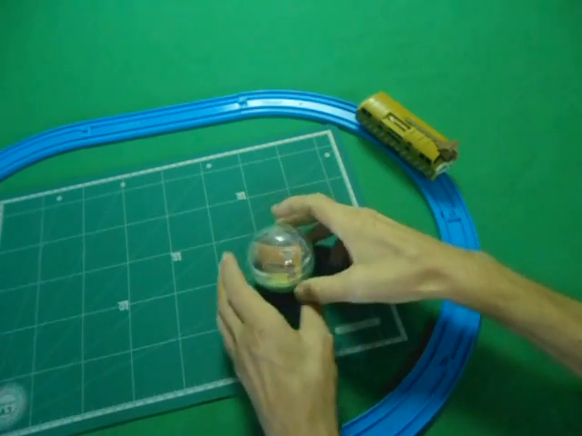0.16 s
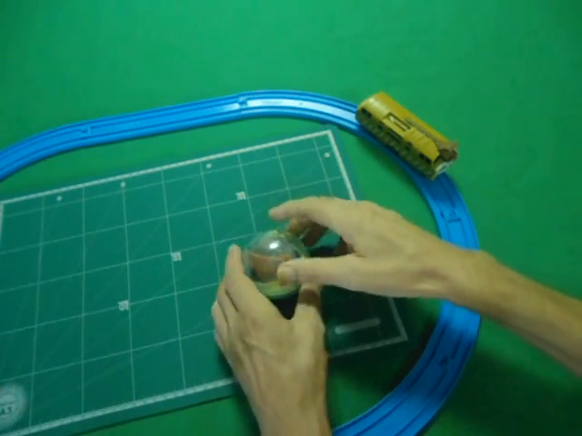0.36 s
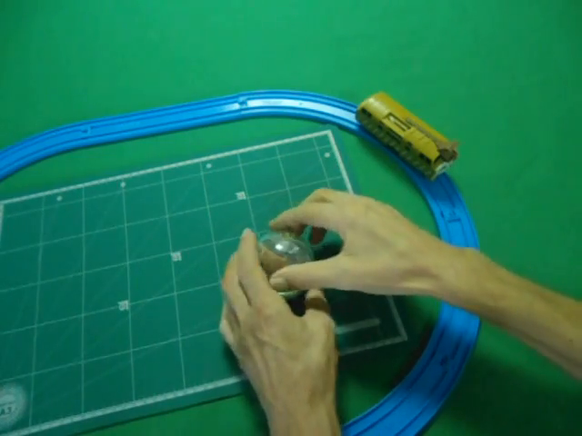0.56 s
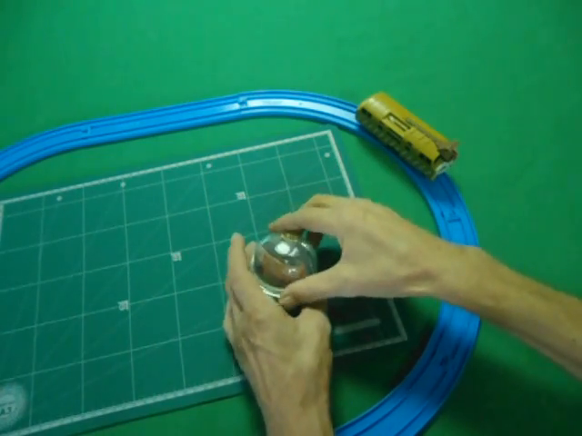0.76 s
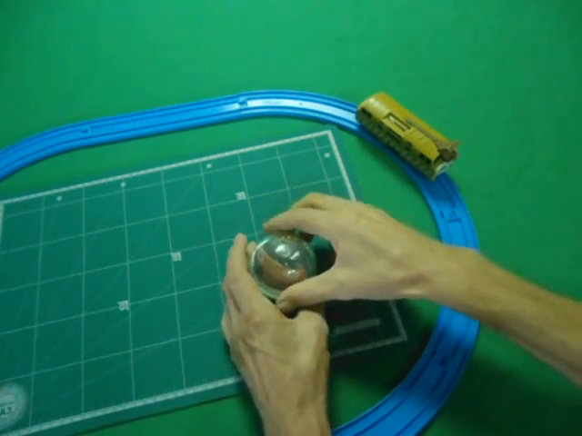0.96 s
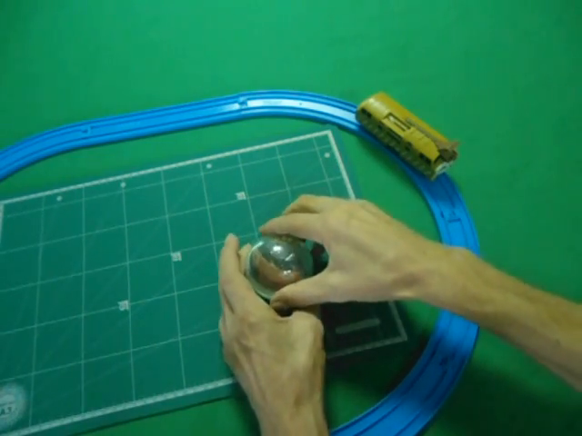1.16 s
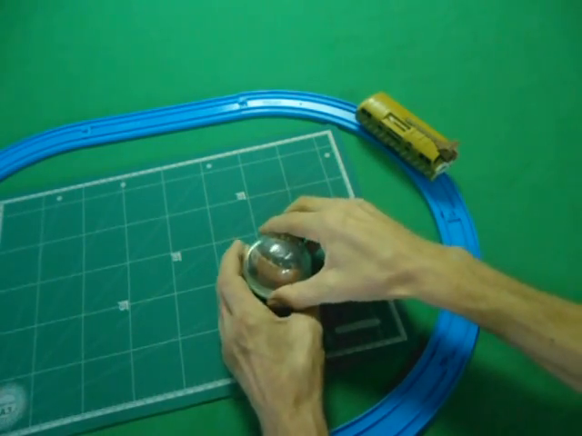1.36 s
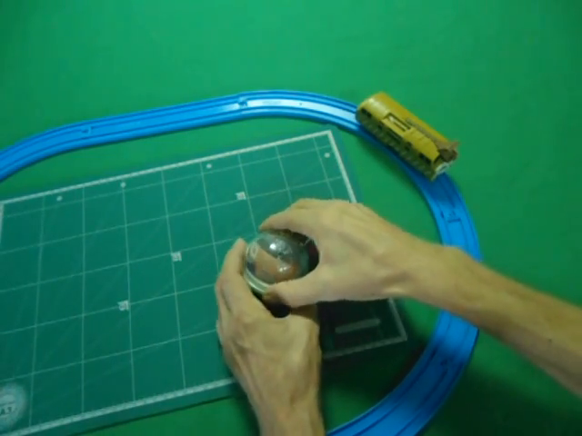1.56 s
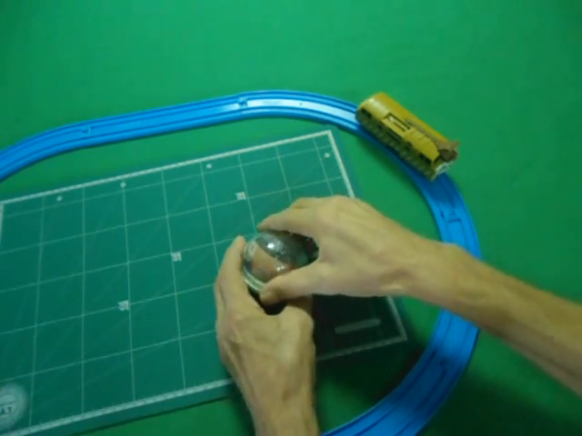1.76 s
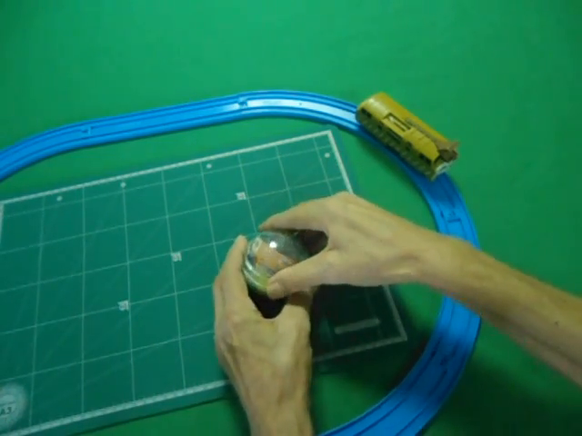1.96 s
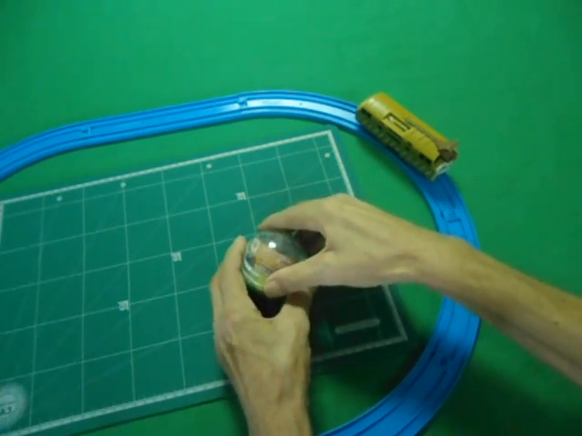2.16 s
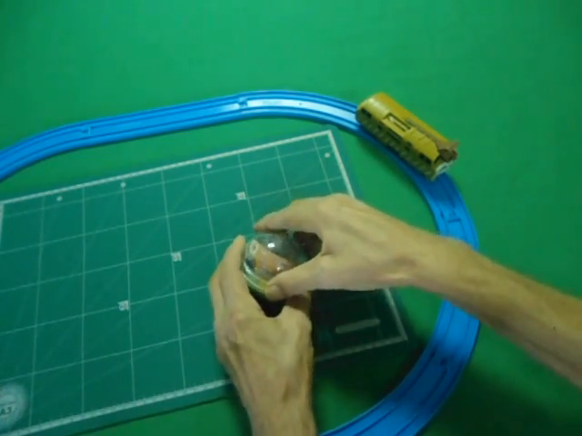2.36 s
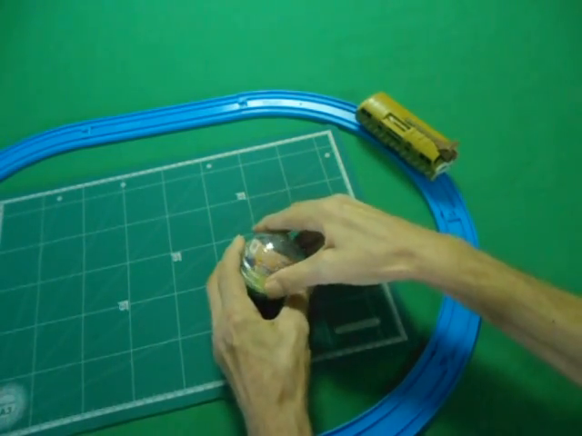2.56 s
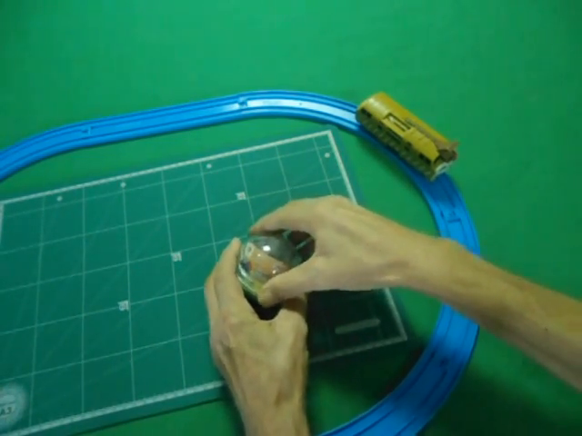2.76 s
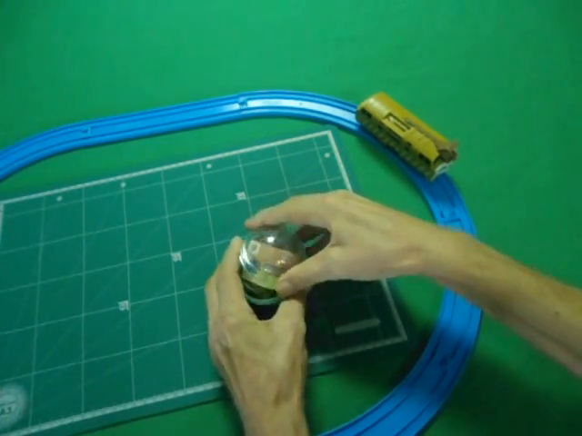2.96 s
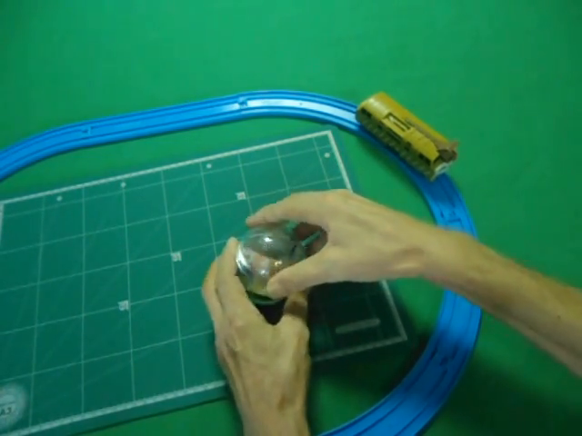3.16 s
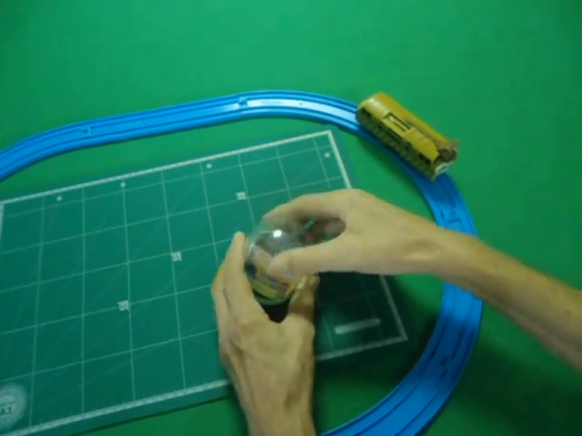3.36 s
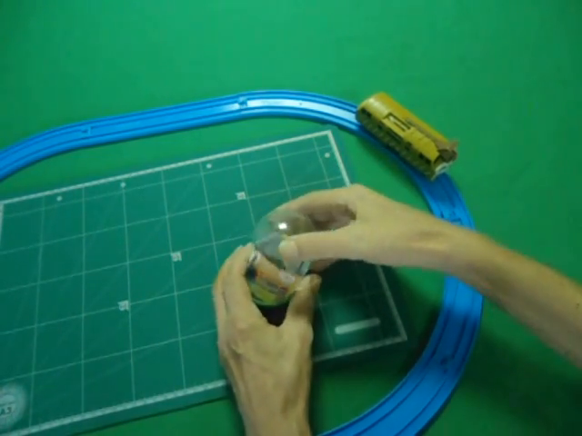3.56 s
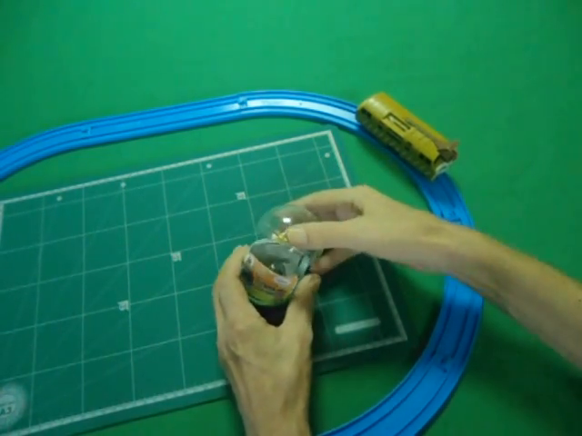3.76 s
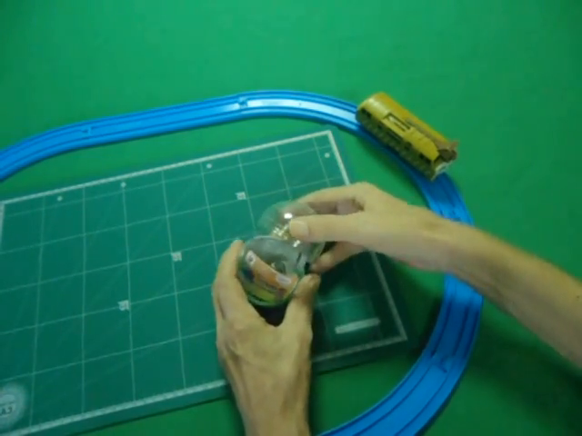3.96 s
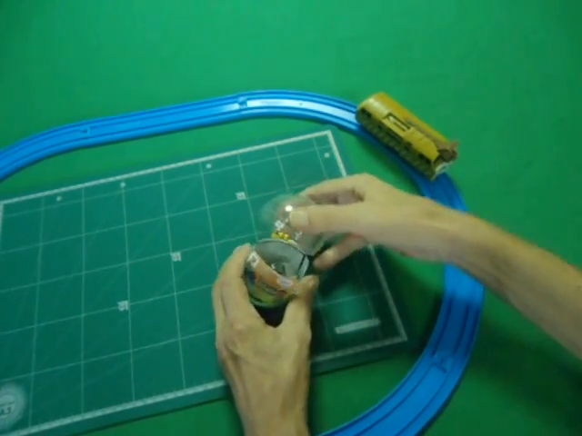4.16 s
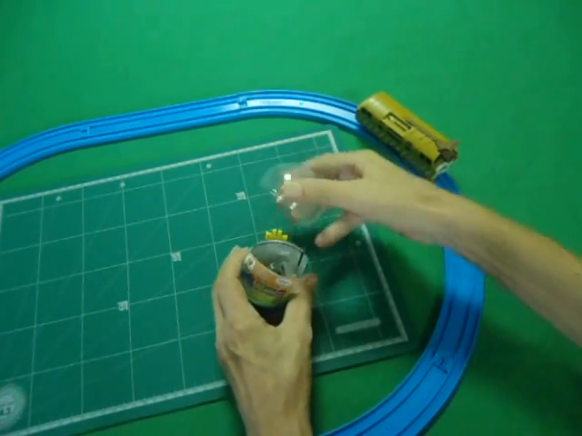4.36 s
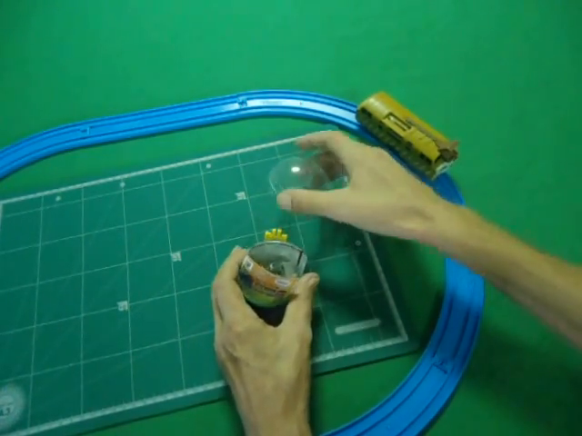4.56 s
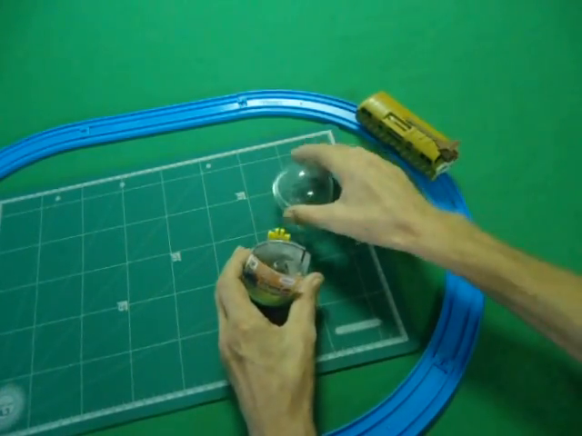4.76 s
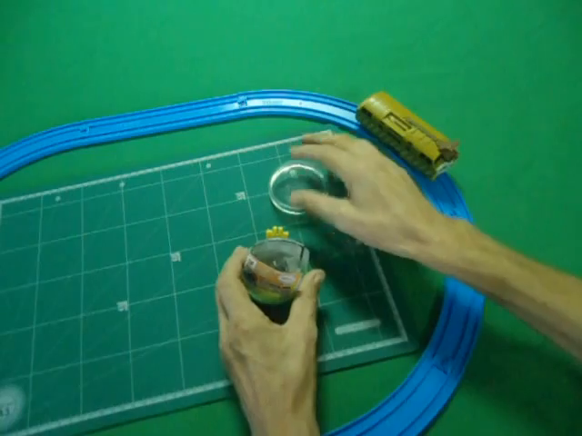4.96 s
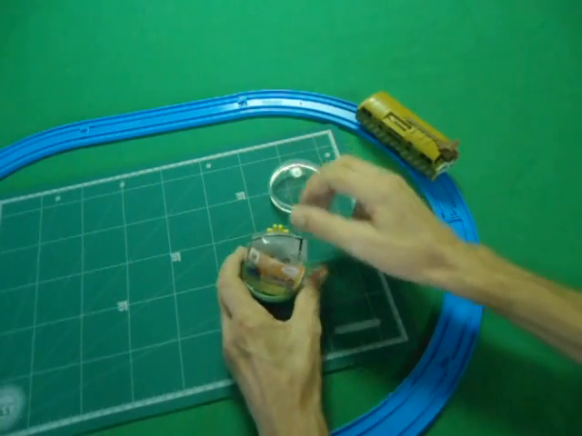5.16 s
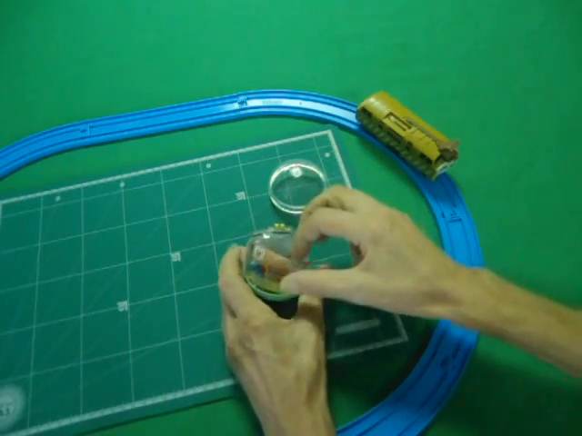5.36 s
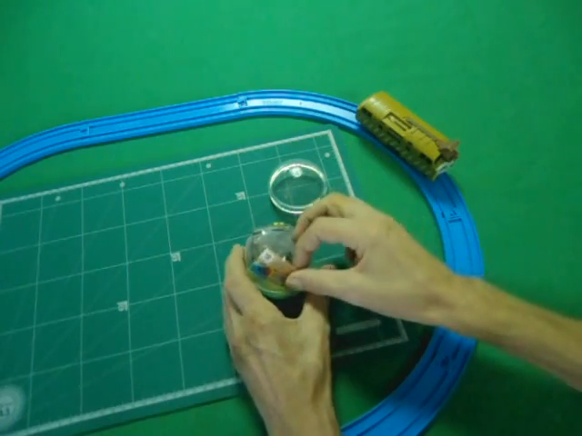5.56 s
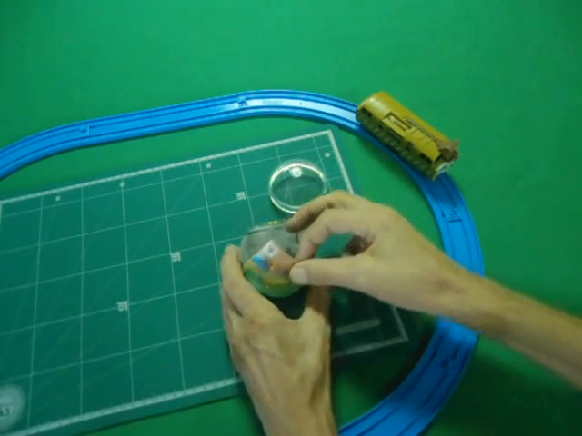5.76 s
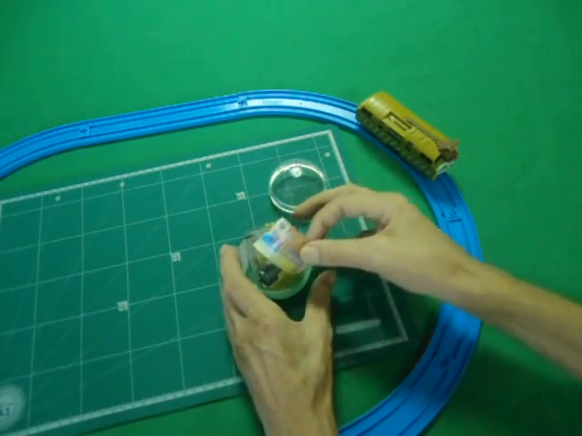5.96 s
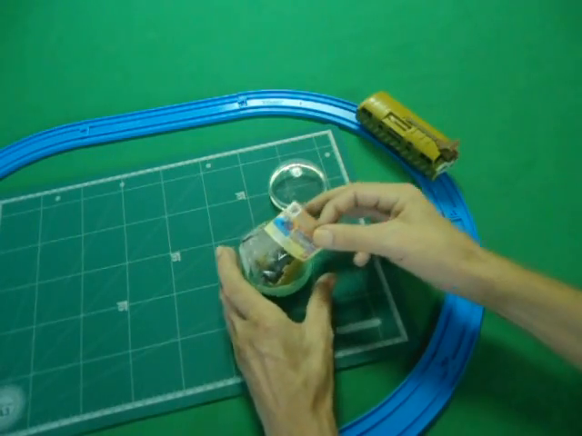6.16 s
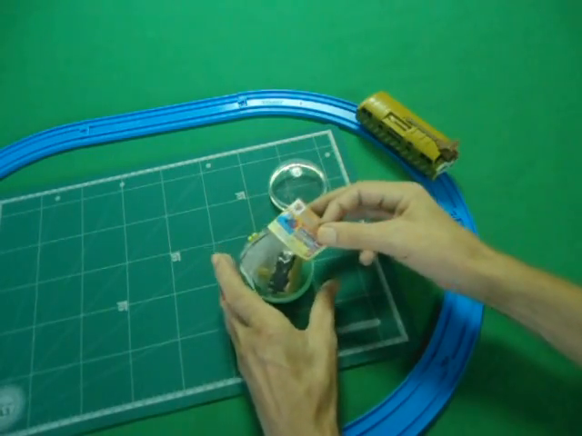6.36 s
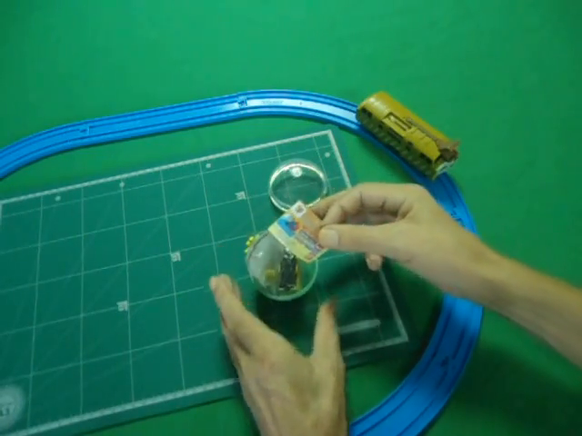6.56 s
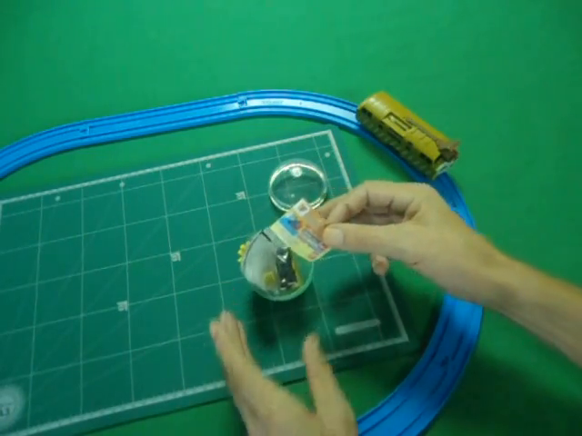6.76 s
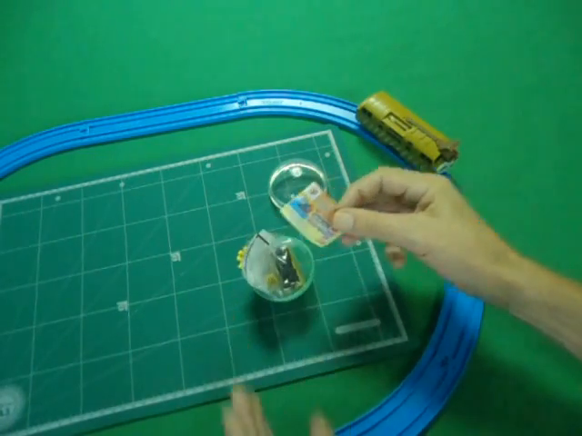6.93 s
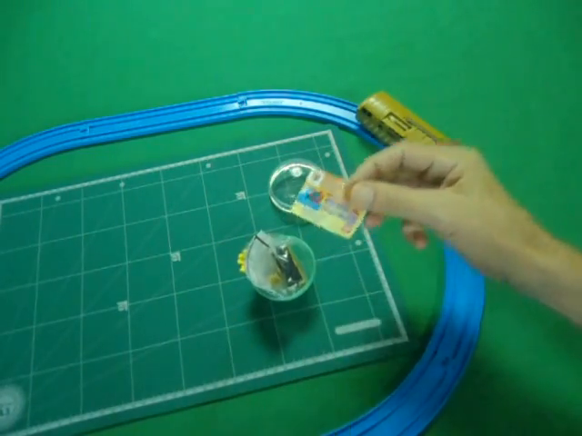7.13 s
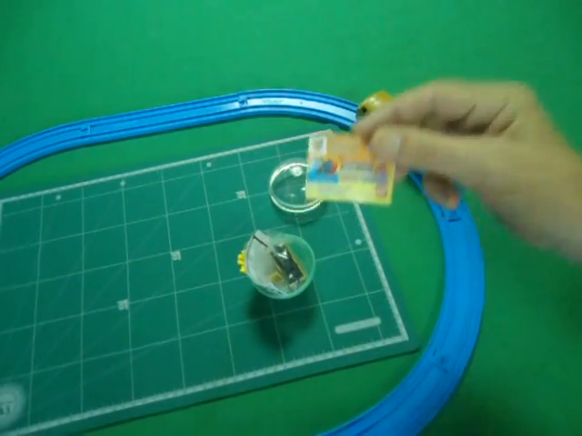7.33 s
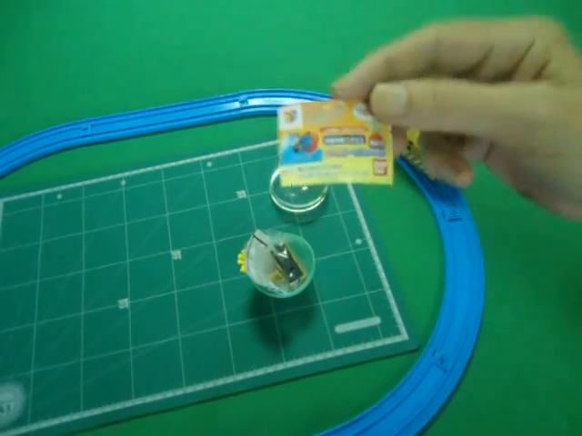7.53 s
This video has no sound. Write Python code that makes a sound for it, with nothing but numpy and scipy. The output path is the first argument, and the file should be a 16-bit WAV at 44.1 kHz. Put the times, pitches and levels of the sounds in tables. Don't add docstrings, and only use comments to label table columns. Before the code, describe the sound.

Close on a table in a small echoing room: low wavering machine hum, faint far bird and pulsing insect. A plastic capsule snaps apart in sharp dry cracks, with light rubbing and sticky ticks afterwards. The lid hits the table very hard and bounces rapidly, briefly ringing, then light fingering and quiet before low thumps and a hollow knock at the end. Limited treble, slightly gritty camera sound.

```python
import sys
import numpy as np
from scipy import signal
from scipy.io import wavfile
from scipy.ndimage import uniform_filter1d

SR = 44100
rng = np.random.default_rng(int(sys.argv[2]) if len(sys.argv) > 2 else 0)


def log_audio(samples):
    frames = np.atleast_2d(samples).T
    limited = np.clip(frames, -1, 1)
    pcm = np.round(limited * 32767).astype(np.int16)
    wavfile.write(sys.argv[1], SR, pcm)


def nominal_scale(level):
    x = np.asarray(level, float) / 20
    return 10 ** x


N = 334851


def evened(x):
    return x / np.sqrt(np.mean(x ** 2) + 1e-20)


def read(points, hz):
    f, value = np.transpose(points)
    return np.interp(np.log(hz + 1), np.log(f + 1), value)


def add(mix, start_s, sound):
    part = mix[round(start_s * SR):][:len(sound)]
    part += sound[:len(part)]


def resonate(x, hz, width_hz):
    turn = np.exp(2j * np.pi * np.cumsum(hz * np.ones(len(x))) / SR)
    r = np.exp(-np.pi * width_hz / SR)
    smoothed = signal.lfilter([1 - r], [1, -r], x / turn)
    return 2 * (turn * smoothed).real


def ring(t, db, hz, t60, rise=0.00029):
    dying = nominal_scale(db - 60 * t / max(t60, .003))
    return dying * np.sin(2 * np.pi * hz * t) * (1 - np.exp(-t / rise))


def wander(rate_hz, count):
    t, f = np.arange(0, N + 512, 512) / SR, np.geomspace(rate_hz / 12, rate_hz, 16)
    turns = f * t[:, None, None] + rng.random((count, len(f)))
    slow = (np.sin(2 * np.pi * turns) / f ** 0.1).sum(axis=2).T
    return [np.interp(np.arange(N) / SR, t, evened(v)) for v in slow]


# frequency in Hz, time to die by 60 dB in seconds.
ECHO = [(100, 0.43), (500, 0.24), (1000, 0.43), (2500, 0.39), (5000, 0.34)]


def room(x):
    taps = np.zeros(SR // 2)
    at = np.arange(150, len(taps) - 20, 20)
    taps[at + rng.integers(0, 20, len(at))] = rng.choice([-1., 1.], len(at))
    hz, t, z = signal.stft(taps, SR, nperseg=256)
    t60 = np.maximum(read(ECHO, hz), .05)[:, None]
    tail = signal.istft(z * nominal_scale(-60 * t / t60), SR, nperseg=256)[1]
    return signal.fftconvolve(x, tail / np.linalg.norm(tail))[:N]


# frequency in Hz, level
# in dB per Hz.
AIR_COLOUR = [(15, -7.5), (28, 4), (45, -6), (70, -13), (120, -10.5), (200, -12.5),
              (300, -17.5), (500, -22.5), (800, -26.5), (1200, -29), (1700, -33), (2500, -35), (4000, -38.5),
            (5500, -36)]
# time in seconds, level in dB.
DRAUGHT = [(0, 4), (1.8, 3), (3.6, 4), (4.8, 4.5), (5.4, 3.5), (6.6, 3.5), (7.1, 2.5), (7.4, 7)]
AIR_DB, HISS_SHARE = -37, 0.37


def air():
    frames, hz = N // 512 + 5, np.fft.rfftfreq(2048, 1 / SR)
    a, b, patches = rng.standard_normal((frames, 1025, 3)).T
    patches = uniform_filter1d(patches, size=14, axis=0)
    patches = evened(uniform_filter1d(patches, size=8, axis=1))
    t, low = np.arange(frames) * 512 / SR, 1 / (1 + (hz[:, None] / 200) ** 2)
    swell_db = (low + HISS_SHARE * (1 - low)) * np.interp(t, *np.transpose(DRAUGHT))
    colour_db = read(AIR_COLOUR, hz)[:, None]
    shape = nominal_scale(colour_db + 1.1 * patches) * (hz < 8000)[:, None]
    spectra = (a + 1j * b) * shape * nominal_scale(swell_db)
    noise = signal.istft(spectra, nperseg=2048, noverlap=1536)[1][:N]
    return nominal_scale(AIR_DB) * evened(noise)


# time in seconds, rms level of the shaft's first order in dB.
LOAD = [(0.05, -31), (0.55, -32), (0.78, -38), (1.04, -28.5), (1.52, -39), (1.65, -30.5), (2.23, -38),
        (2.37, -31), (2.89, -29.5), (2.96, -45), (3.1, -33), (3.18, -38), (4.25, -33), (4.57, -37),
        (5.97, -35.5), (6.21, -37), (6.43, -32.5), (7.3, -31)]
# multiple of the speed, level in dB, share of the load swing, own wander in dB.
SHAFT_ORDERS = [(1, -1.2, 1.0, 0.6), (2, -31, .3, 1.5), (3, -45, .3, 2.0), (5, -42, .2, 2.2)]
# time in seconds, frequency in Hz, rms level in dB.
FAR_MOTOR = [(0, 144, -47.5), (.5, 144, -59.5), (1.4, 144, -61.5), (1.9, 145, -41), (2.2, 145, -45.5),
             (2.4, 145, -42.5), (2.75, 145, -43), (2.95, 145, -47), (3.55, 144.5, -40.5), (3.95, 146, -52),
             (4.299, 155, -44), (4.85, 150, -50.5), (5.101, 145, -45.5), (5.5, 148, -50.5), (6.1, 151, -49),
             (6.6, 155, -45.5), (7.251, 152, -48), (7.59, 157, -42.5)]
SHAFT_HZ = 47.7


def machines():
    t = np.arange(N) / SR
    slip = wander(6.0, count=1)[0]
    load_db = np.interp(t, *np.transpose(LOAD))
    hum = np.zeros(N)
    for (k, db, share, own_db), w in zip(SHAFT_ORDERS, wander(5.0, count=4)):
        turns = round(k) * (SHAFT_HZ * t + 0.017 * slip) + rng.random()
        hum += nominal_scale(db + share * load_db + own_db * w) * np.sin(2 * np.pi * turns)
    s, hz, db = np.transpose(FAR_MOTOR)
    motor_turns = np.cumsum(np.interp(t, s, hz)) / SR
    motor = nominal_scale(np.interp(t, s, db, left=-90)) * np.sin(2 * np.pi * motor_turns)
    return np.sqrt(2) * (hum + motor)


# start in seconds, rms level in dB, Hz at start, Hz at end, length in seconds.
BIRD_PEEPS = [
    (0.214, -54.5, 4500, 4700, 0.028),
    (0.42, -60, 3280, 3300, 0.16),
    (0.674, -56, 2390, 2460, 0.13),
    (3.895, -56, 4550, 4930, 0.028),
    (3.92, -57, 4100, 4000, 0.08),
    (4.031, -62, 3300, 3200, 0.38),
    (3.69, -66, 3130, 3100, .06),
]


def bird():
    out = np.zeros(N)
    for s, db, start_hz, end_hz, length in BIRD_PEEPS:
        hz = np.linspace(start_hz, end_hz, int(length * SR))
        blur = resonate(rng.standard_normal(SR)[:len(hz)], hz, 160)
        add(out, s, nominal_scale(db) * evened(resonate(blur, hz, 320)) * np.hanning(len(hz)) ** .5)
    return out


THROB_CRESTS = [0.881, 0.949, 1.026, 1.097, 1.187, 1.268, 1.352, 1.44, 1.531, 1.622, 1.72, 1.822, 1.912,
                1.98, 2.05, 2.115, 2.163]
# frequency in Hz, width in Hz, level in dB.
INSECT_DRUM = [(3950, 130, -6), (4080, 390, -5.5), (4400, 340, 0), (4736, 350, 1.5), (5020, 280, 1.5)]
THROB_DB, SAG_DB_PER_S, SWELL_IN_S, DIE_OUT_S = -45.5, 2.7, 0.27, 0.12
DUTY = .33


def insect():
    t = np.arange(N) / SR
    gaps = np.gradient(THROB_CRESTS)
    power = sum(np.exp(-((t - s) / (DUTY * gap)) ** 2) for s, gap in zip(THROB_CRESTS, gaps))
    since, left = t - THROB_CRESTS[0] + .15, THROB_CRESTS[-1] + .04 - t
    fade = np.clip(np.minimum(since / SWELL_IN_S, left / DIE_OUT_S), 0, 1)
    effort = nominal_scale(THROB_DB - SAG_DB_PER_S * since) * fade
    clicks = rng.standard_normal(N) * (rng.random(N) < .12)
    knots, drum = np.arange(100) * 0.12, np.zeros(N)
    for hz, width, db in INSECT_DRUM:
        shift, wane = (np.interp(t, knots, v) for v in rng.standard_normal((2, 100)))
        hz = hz * (1 + 0.0058 * shift)
        drum += nominal_scale(db + 1.5 * wane) * resonate(resonate(clicks, hz, width), hz, 1.8 * width)
    return evened(drum) * np.sqrt(power) * effort


# start in seconds, length in seconds, rms level in dB, pitch in Hz.
SHELL_HOLLOW = [
    (1.1, 1.55, -61, 1160),
    (3.62, .9, -58.5, 1150),
    (6.55, .8, -61.5, 1185),
]
GRIP_S, IDLE_DB = 0.1, -72.5


def hollow():
    t, (drift, press) = np.arange(N) / SR, wander(3.0, count=2)
    grip = np.zeros(N)
    for s, length, db, _ in SHELL_HOLLOW:
        grip += nominal_scale(db) * np.clip(np.minimum(t - s, s + length - t) / GRIP_S, 0, 1)
    pitch = np.transpose([(s, f) for s, _, _, f in SHELL_HOLLOW])
    hz = np.interp(t, *pitch) * (1 + 0.01 * drift)
    song = evened(resonate(resonate(rng.standard_normal(N), hz, 150), hz, 220))
    return (nominal_scale(IDLE_DB) + grip * nominal_scale(3.0 * press)) * song


# start in seconds, peak in dB, frequency in Hz, time to die by 60 dB in s.
TABLE_THUMPS = [(2.975, -26, 60, .2), (2.974, -27, 260, .08), (3.018, -20, 26, .3), (4.944, -24, 300, .12),
                (4.945, -30, 140, .15), (7.28, -26, 60, .2), (7.39, -22, 55, .12), (7.432, -12, 33, .2),
                (7.457, -10, 50, .08), (7.484, -26, 45, .3), (7.535, -26, 45, .2)]


def thumps():
    out, t = np.zeros(N), np.arange(20000) / SR
    for s, db, hz, t60 in TABLE_THUMPS:
        add(out, s, -ring(t, db + 1.5, hz, t60, rise=.003))
    return out


# start in seconds, rms level in dB, centre in Hz, width in Hz,
# length in seconds.
LONG_STROKES = [
    (0.133, -51, 1030, 890, 0.12),
    (3.004, -51, 3000, 3000, .12),
    (3.143, -55, 1780, 2480, 0.39),
    (4.94, -36.5, 2100, 1800, 0.063),
    (4.957, -34.5, 400, 350, 0.28),
    (5.962, -57, 4260, 2010, 0.084),
    (7.271, -48.5, 690, 700, 0.17),
    (7.252, -53, 4140, 1500, 0.1),
    (7.443, -53, 3500, 3000, .06),
]
# start in seconds, rms level in dB, centre in Hz, length in seconds.
RIM_SCRAPES = [(0.589, -52.5, 3400, 0.033), (2.975, -45, 2800, .025), (2.992, -32, 2330, 0.035),
               (2.996, -23.5, 3550, .0073), (3.002, -27.5, 5400, 0.017), (3.208, -41, 1500, 0.026),
               (3.209, -49, 2480, 0.022), (3.297, -41, 4870, 0.022), (3.298, -43.5, 2580, 0.022),
               (3.299, -41.5, 1000, 0.041), (3.333, -60, 3000, .05), (3.495, -53, 2300, 0.028),
               (3.675, -42.5, 1610, 0.032), (3.915, -56, 3460, 0.06), (4.224, -50, 4830, 0.027),
               (4.328, -40.5, 2570, 0.032), (4.33, -40, 1500, 0.054), (4.334, -45, 5070, 0.048),
               (5.162, -54, 4660, 0.098), (5.72, -56, 4300, .049), (5.93, -51.5, 4540, 0.028),
               (7.251, -48.5, 2030, 0.023), (7.458, -45, 1500, .018)]
PATCH_HZ, PATCH_SHARE = 500, 0.085
# start in seconds, rms level in dB, centre in Hz.
STICKY_TICKS = [(.599, -44, 3900), (3.338, -32.5, 900), (3.53, -46, 2470), (3.829, -48, 3470),
                (4.042, -48.5, 3250), (4.164, -45, 3970), (4.266, -49.5, 3970), (4.427, -49.5, 3500),
                (4.628, -51, 3000), (4.9411, -19.5, 5000), (5.0505, -29.5, 2450), (5.383, -48, 3800),
                (5.425, -49, 4080), (5.537, -44, 2430), (7.459, -44, 2600), (7.469, -56, 3600)]
TICK_WIDTH_HZ, TICK_S = 2300, .008


def rubs():
    out = np.zeros(N)
    scrapes = [(s, db, hz, PATCH_HZ + PATCH_SHARE * hz, length) for s, db, hz, length in RIM_SCRAPES]
    ticks = [(s, db, hz, TICK_WIDTH_HZ, TICK_S) for s, db, hz in STICKY_TICKS]
    for s, db, hz, width, length in LONG_STROKES + scrapes + ticks:
        slips = rng.standard_normal(8000) * nominal_scale(2.5 * rng.exponential(1, 8000))
        slips *= rng.random(8000) < .3
        u = np.arange(8000) / SR / max(length, .003)
        stroke = np.minimum(16 * u, 1) * np.exp(-2.5 * u ** 2)
        rub = resonate(resonate(slips, hz, width), hz, width) * stroke
        add(out, s, nominal_scale(db) * rub * np.linalg.norm(stroke) / np.linalg.norm(rub))
    return out


STIFFEN = 0.35


def hits(rows, modes, blow_t60):
    out, t = np.zeros(N), np.arange(12000) / SR
    for s, db, hz, tick_db, ring_db in rows:
        place_db, noise = 0.53 * rng.standard_normal(len(modes)), rng.standard_normal(len(t))
        blow = -ring(t, db + 3.5, hz, blow_t60 * nominal_scale(-STIFFEN * (db + 9)), rise=0.00083)
        tick = nominal_scale(-60 * t / 0.012) * resonate(noise, 1800, 3500)
        tick *= nominal_scale(tick_db) / abs(tick).max()
        shell = np.zeros(len(t))
        for (f, d, t60), p in zip(modes, place_db):
            shell += ring(t, ring_db + d + p, f, min(t60, .25))
        add(out, s, blow + tick + shell)
    return out


# frequency in Hz, level in dB, time to die by 60 dB in seconds.
CAPSULE_MODES = [(560, -11, 0.044), (800, 1.5, 0.026), (1051, -1.5, 0.052), (1350, 0, 0.018),
                 (1500, -2, 0.013), (2300, -12, 0.018), (2466, -26.5, 0.02), (3000, -12, 0.048),
                 (3550, -16.5, 0.027), (4830, -9, 0.012)]
# start in seconds, blow peak in dB, blow in Hz, tick in dB, ring in dB.
BASE_KNOCKS = [
    (7.2525, -28.5, 600, -32, -41),
    (7.2570, -24, 560, -51, -46),
    (7.4292, -25.5, 560, -50.5, -64),
    (7.4312, -15.5, 546, -54, -38),
]


def knocks():
    return hits(BASE_KNOCKS, CAPSULE_MODES, blow_t60=0.02)


# frequency in Hz, level in dB, time to die by 60
# dB in seconds.
LID_MODES = [(205, -5, .15), (320, -14, .08), (409, -12, .15), (480, -14, .1), (700, -12, .1),
             (845, -8, .2), (969, -3, .13), (1044, -3, .09), (1285, -7, .07), (1470, -14, .15),
             (1868, -24, .12), (2400, -27, .04), (3000, -24, .04),
             (3590, -23, .07), (3661, -16, .11), (3755, -13.5, .075), (3880, -24, .05)]
# start in seconds, blow peak in dB, blow in Hz, tick in dB, ring in dB.
LID_BOUNCES = [(4.9425, 16, 1125, -5.5, -16.5), (4.9497, -23.5, 1000, -40, -26),
               (4.9522, -8, 1100, -21, -36), (4.9562, -1.5, 970, -43.5, -44),
               (4.9635, -19, 610, -32, -23.5), (4.9720, -16.5, 1050, -45, -35.5),
               (4.9810, -25, 800, -46.5, -24), (5.0098, -3.5, 1095, -23, -29), (5.0164, -8, 1040, -46, -49),
               (5.0496, -4, 970, -19, -23), (5.0553, -9, 820, -38, -45), (5.0605, -12, 800, -34, -55),
               (5.0735, -15, 940, -49, -47), (5.0838, -6.5, 734, -16, -35.5)]


def lid_bounces():
    return hits(LID_BOUNCES, LID_MODES, blow_t60=.013)


# start in seconds, blow peak in dB, blow in Hz, tick in dB, ring in dB.
SEAM_CRACKS = [(2.9735, -42, 876, -17.5, -50), (2.9754, -12, 560, -19.5, -29),
               (2.9915, -17, 1305, -19, -22), (2.9930, -14, 964, -29.5, -19), (2.9955, 2, 933, -13.5, -17),
               (3.0003, -12, 1095, -31, -35), (3.0065, -25, 1010, -21.5, -37),
               (3.0095, -15, 1070, -38, -28), (3.0160, -29, 1020, -33, -20.5), (3.120, -36, 830, -40, -33),
               (3.135, -34, 996, -31, -39), (3.207, -32, 1213, -33.5, -38), (3.338, -35.5, 800, -43, -52),
               (3.372, -47.5, 1390, -42, -60), (3.6795, -36, 1500, -28, -48),
               (.602, -38.5, 905, -34.5, -49), (1.718, -41, 1065, -39, -46)]


def seam_cracks():
    return hits(SEAM_CRACKS, CAPSULE_MODES, blow_t60=0.011)


def scene():
    back = air() + machines() + insect() + bird() + hollow()
    capsule, lid, knocking, rubbing = seam_cracks(), lid_bounces(), knocks(), rubs()
    near = capsule + lid + knocking + rubbing
    wet = nominal_scale(-6.0) * capsule + nominal_scale(-10.5) * lid + knocking / 6 + nominal_scale(-7.0) * rubbing
    return (back + near + thumps() + room(wet))[None]


def top_cut(x):
    return signal.sosfilt(signal.butter(12, 16500, fs=SR, output="sos"), x)


def record(dry):
    guard = signal.firwin(61, 5150, window=("kaiser", 5.5), fs=SR)
    guarded = signal.oaconvolve(np.clip(dry, -.935, .935), guard[None], "same")
    kept = np.zeros(dry.shape)
    kept[:, ::4] = 4 * guarded[:, ::4]
    smooth = signal.firwin(65, 5500, window=("kaiser", 8.5), fs=SR)
    full = signal.oaconvolve(kept, smooth[None], "same")
    ceiling = .989 * abs(full).max()
    dither = nominal_scale(-97) * rng.standard_normal(dry.shape)
    full = np.clip(full, -ceiling, ceiling) + dither
    return top_cut(full)


dry = scene()
out = record(dry)
log_audio(out)
```